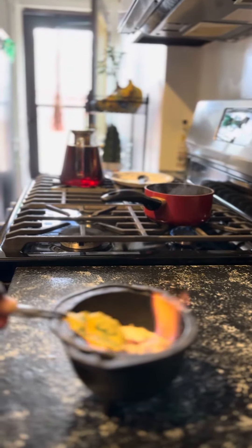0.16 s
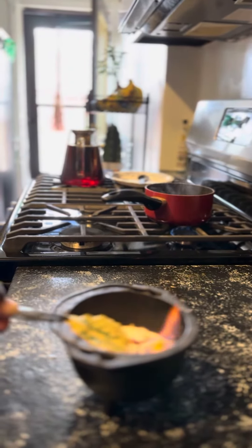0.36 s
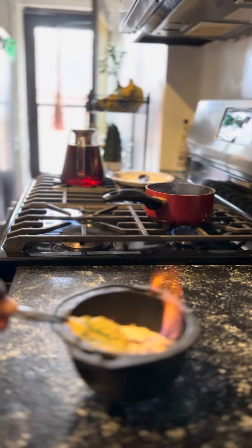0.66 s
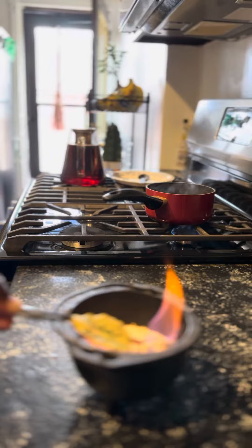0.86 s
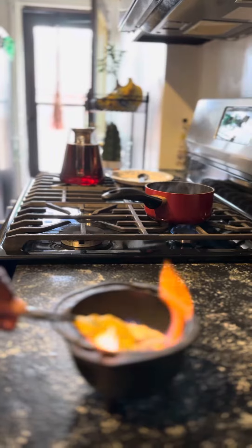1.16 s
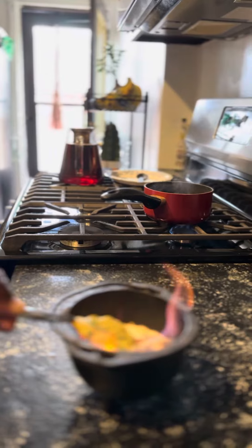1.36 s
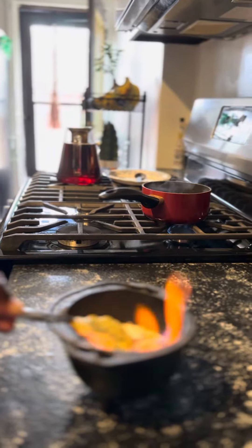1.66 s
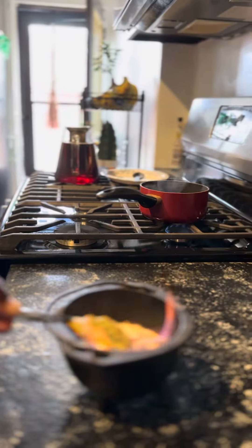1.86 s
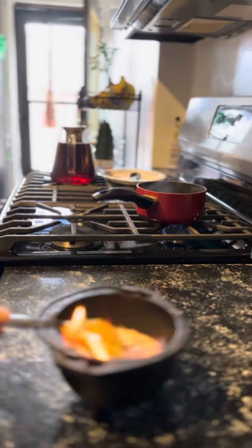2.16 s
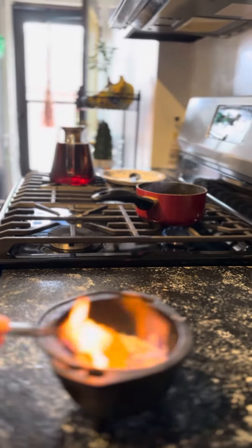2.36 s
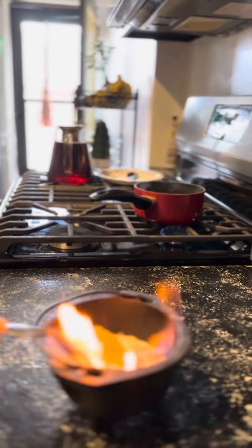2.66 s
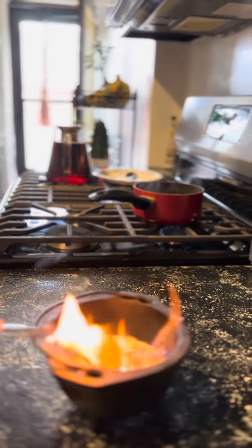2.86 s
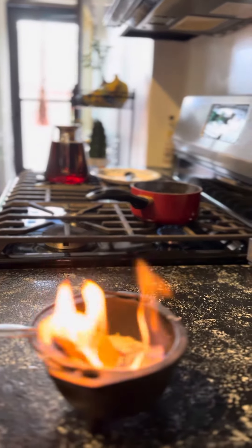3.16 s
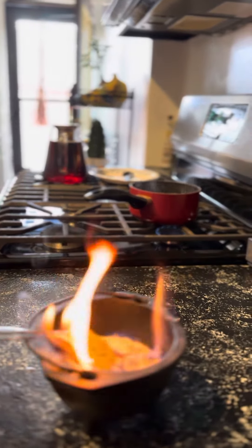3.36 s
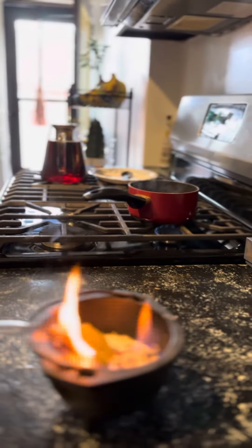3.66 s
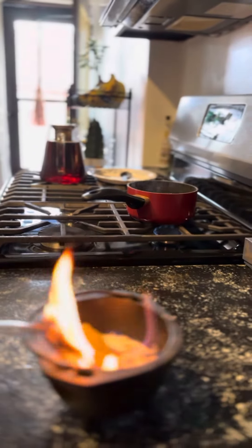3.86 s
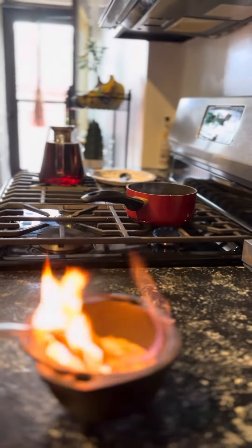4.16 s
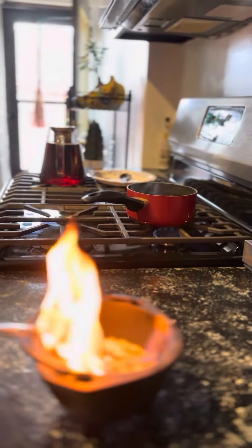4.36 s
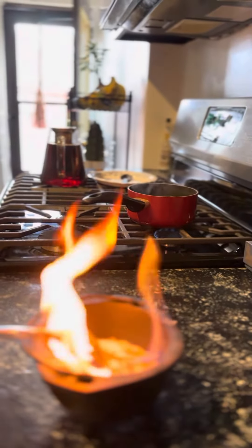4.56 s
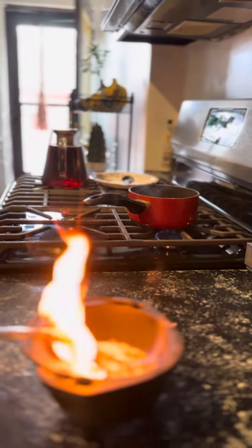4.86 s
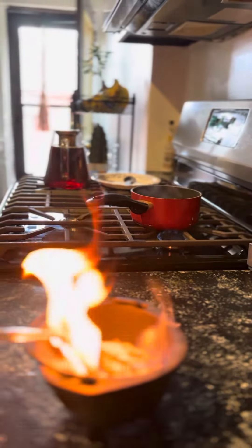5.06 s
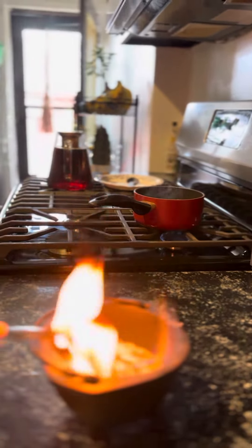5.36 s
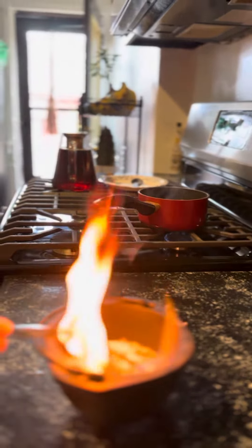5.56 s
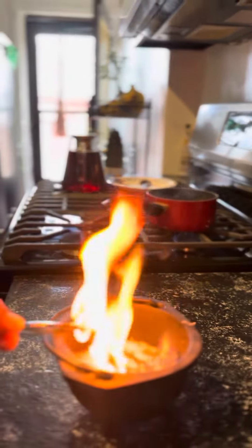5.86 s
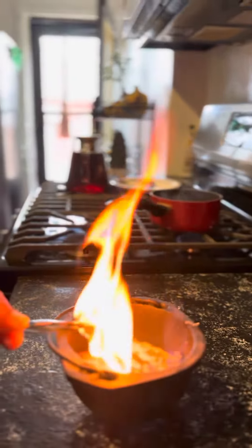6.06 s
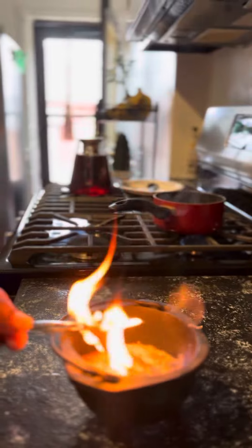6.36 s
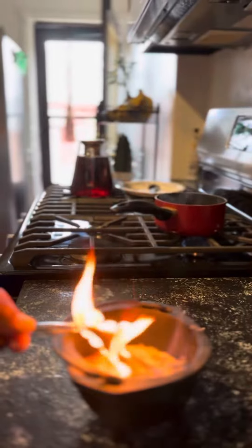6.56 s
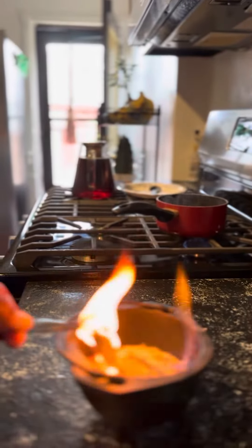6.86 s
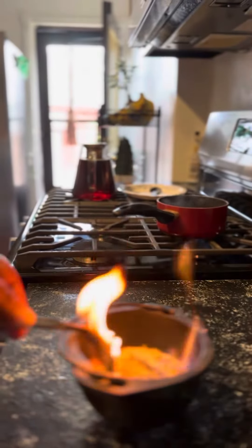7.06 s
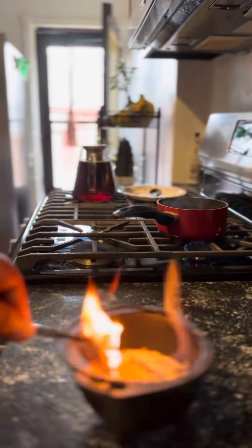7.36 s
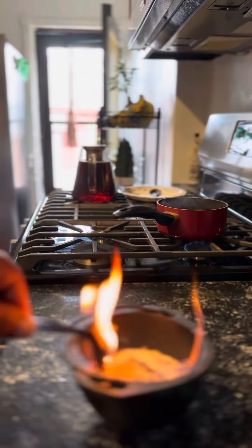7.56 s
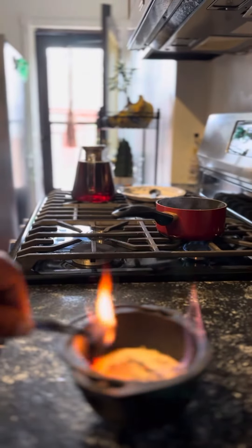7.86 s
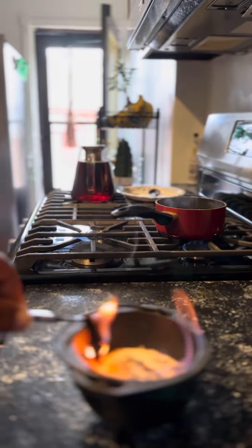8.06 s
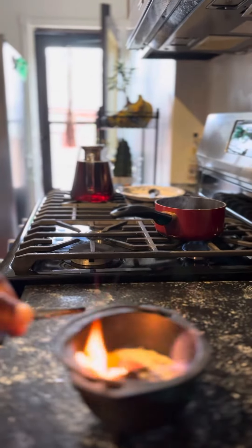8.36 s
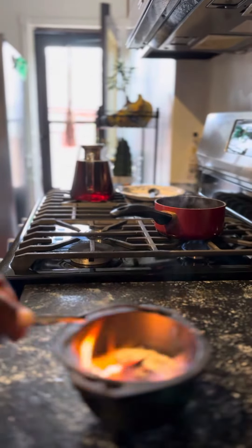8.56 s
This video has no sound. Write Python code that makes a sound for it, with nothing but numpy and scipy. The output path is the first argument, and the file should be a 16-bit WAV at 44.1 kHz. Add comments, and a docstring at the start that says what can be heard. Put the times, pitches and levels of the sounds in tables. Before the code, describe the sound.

A quiet kitchen hum, then paper catches and burns close by, with gusty flame flutter, fizzing crackle and irregular crisp snaps continuing to the end.

```python
"""A low kitchen hum and soft room noise come first, with a faint flame that soon grows.
Paper burns in a small bowl on a counter, close by, flaring up patch by patch.
The flame is made of short puffs with falling pitch, filtered noise and low thuds.
The charring fibres fizz, crackle and snap: tiny bursts of noise and rings, shaped by the paper.
The hum is a set of wavering sine tones; short decaying noise makes the hard room answer."""
import sys
import numpy as np
from scipy import signal
from scipy.fft import rfft, irfft, next_fast_len
from scipy.io import wavfile
from scipy.ndimage import map_coordinates

SR = 44100
rng = np.random.default_rng(int(sys.argv[2]) if len(sys.argv) > 2 else 0)


def materialize(psi):
    """Save the field psi as 16-bit PCM at rate SR to the path in sys.argv[1].

    A 1-D psi becomes a single channel; in a 2-D psi each row is a channel.
    """
    bounded = np.clip(np.atleast_2d(psi).T, -1, 1)
    quanta = np.round(bounded * 32767).astype(np.int16)
    wavfile.write(sys.argv[1], SR, quanta)


N = 384552


def amp(db):
    """Turn decibels into a gain."""
    return 10 ** (np.asarray(db) / 20)


def unit(x):
    """Scale a sound to an rms of 1."""
    return x / np.sqrt(np.mean(x ** 2) + 1e-20)


def along(points, hz):
    """Read a curve of (Hz, value) points, with pitch on a log axis."""
    f, v = np.transpose(points)
    return np.interp(np.log(hz + 1), np.log(f + 1), v)


def curves(rows):
    """Give one value per sample for each column after the time."""
    s, *columns = np.transpose(rows)
    return [np.interp(np.arange(N) / SR, s, column) for column in columns]


def wobble(rate, size=32):
    """A smooth random curve with rate random points a second."""
    coarse = np.arange(0, N + size, size)
    knots = rng.standard_normal(int(N * rate / SR) + 4)
    smooth = map_coordinates(knots, [coarse * rate / SR])
    return np.interp(np.arange(N), coarse, smooth)


def swell(s, length_s):
    """A smooth rise and fall of height 1 around time s; length_s is its width at 1/e of the height."""
    reach = np.minimum(np.abs(np.arange(N) / SR - s) / length_s, 2)
    return np.exp(-(2 * reach) ** 2)


def filtered(x, response):
    """Filter x with a gain (real or complex) given for each frequency."""
    m = next_fast_len(N + SR // 2)
    return irfft(rfft(x, m) * response(np.fft.rfftfreq(m, 1 / SR)), m)[..., :N]


def coloured(x, spectrum, size=4096):
    """Give x a spectrum through a filter of energy 1 that never sounds ahead of its input."""
    cepstrum = irfft(np.log(amp(along(spectrum, np.fft.rfftfreq(size, 1 / SR)))))
    # folding the cepstrum forward gives minimum phase
    cepstrum[1:size // 2] *= 2
    cepstrum[size // 2 + 1:] = 0
    response = irfft(np.exp(rfft(cepstrum)))
    return signal.fftconvolve(x, response / np.linalg.norm(response))[:N]


def add(track, s, sound):
    """Mix a short sound into a track at time s."""
    part = track[max(round(s * SR), 0):][:len(sound)]
    part += sound[:len(part)]


def placed(times, rows):
    """Make a track in which each short row starts at its time."""
    starts = np.round(np.abs(times) * SR).astype(int)[:, None]
    where = starts + np.arange(rows.shape[1])
    return np.bincount(where.ravel(), rows.ravel(), N)[:N]


def sparks(rate, spread_db):
    """Random clicks, about rate a second, with sizes scattered in dB; rms 1."""
    at = np.flatnonzero(rng.random(N) < rate / SR)
    size, sign = rng.standard_normal((len(at), 2)).T
    clicks = np.sign(sign) * amp(spread_db * np.minimum(size, 2))
    return unit(np.bincount(at, clicks, N))


# How alike the room noise is at the two microphone ports: f/Hz, likeness (1 = the same)
PORT_LIKENESS = [(60, .98), (300, .92), (700, .5), (2000, .25), (8000, .15)]
# Colour of the room noise: f/Hz, level/dB (relative, per Hz)
KITCHEN_SPECTRUM = [(20, -34), (45, -5.5), (62, 10), (90, -6.5), (135, -1), (210, -4.5), (340, -3.5),
                    (700, -16), (1100, -33), (1700, -25.5), (2400, -26), (3400, -38.5), (5600, -37.5),
                    (9000, -44), (13000, -81)]
# Tones of the appliance: f/Hz, level/dB (rms, before the wavering)
APPLIANCE_TONES = [(59.5, -64), (120, -71), (147, -67), (339, -68), (589, -77.5), (727, -79.5),
                   (824, -80.5), (904, -94), (1297, -102), (1884, -85)]


def kitchen():
    """Noise arriving from all sides, less alike at the two ports at high pitch, plus an appliance's tones."""
    # a shared and an opposite part, mixed by this angle, set the likeness
    turn = lambda hz: np.arccos(np.clip(along(PORT_LIKENESS, hz), -1, 1)) / 2
    split = lambda hz: amp(along(KITCHEN_SPECTRUM, hz)) * [np.cos(turn(hz)), np.sin(turn(hz))]
    mid, side = filtered(rng.standard_normal((2, N)), split)
    noise = amp(-55.5) * unit(np.array([mid + side, mid - side]))
    t = np.arange(N) / SR
    hum = np.zeros(N)
    for hz, db in APPLIANCE_TONES:
        level = amp(db + 2.9 * wobble(3.7)) * np.sqrt(2)
        hum += level * np.sin(2 * np.pi * hz * t + 0.57 * wobble(6))
    return noise + hum


# How long the room rings, as the time to fall by 60 dB: f/Hz, t/s
ROOM_DECAY = [(200, 0.15), (2500, 0.1), (8000, 0.14), (15000, 0.0066)]


def room(x, count, delay_s=.003):
    """Walls answer with a short tail, different at each port; the sound moves between count spots."""
    hz, t, z = signal.stft(rng.standard_normal((count, 2, SR // 2)), SR, nperseg=256)
    fading = amp(-60 * t / along(ROOM_DECAY, hz)[:, None])
    tails = signal.istft(z * fading, SR, nperseg=256)[1]
    tails /= np.linalg.norm(tails, axis=2, keepdims=True)
    spots = np.exp(2 * np.array([wobble(40) for _ in tails]))
    late = np.pad(x, (int(delay_s * SR), 0))[:N] * spots / np.linalg.norm(spots, axis=0)
    return signal.oaconvolve(late[:, None], tails, axes=2).sum(0)[:, :N]


# Level difference of the two ports, left minus right: f/Hz, level/dB
PORT_BALANCE = [(150, .3), (400, 1.4), (700, 4), (1100, 2.5), (1600, .8), (2900, 3.5), (3900, 0),
                (5200, -3.5), (7000, 0)]
# Phase by which the left port leads: f/Hz, phase/radians
PORT_LEAD = [(100, 0), (700, .6), (1200, -.3), (2700, .1), (3200, -1.1), (4000, 0), (4900, 2.3), (5800, 0),
             (7500, -.5), (11000, -2.6), (15500, -3.8)]


def ports(x):
    """Direct sound reaches the two microphone ports with a different phase and level."""
    half = np.array([[1], [-1]]) / 2
    gain = lambda hz: amp(half * along(PORT_BALANCE, hz))
    return filtered(x, lambda hz: gain(hz) * np.exp(1j * half * along(PORT_LEAD, hz)))


RIM_S, RIM_DB = 0.0028, -9  # decay time (s) and level (dB) of the early reflections


def rim(x, size=512, count=5):
    """Early reflections off bowl and counter, different at each port, change with the spot that burns."""
    t = np.arange(size) / SR
    clusters = rng.standard_normal((count, 2, size)) * np.sqrt(t) * np.exp(-t / RIM_S)
    clusters /= np.linalg.norm(clusters, axis=2, keepdims=True)
    spots = np.array([wobble(90) for _ in clusters])
    spots /= np.linalg.norm(spots, axis=0)
    return amp(RIM_DB) * signal.oaconvolve((spots * x)[:, None], clusters, axes=2).sum(0)[:, :N]


# Slow course of the fire: t/s, flame level/dB, charring level/dB
SLOW_BURN = [(0, -70.5, -85.5), (.42, -69.5, -88), (.49, -63, -76), (1.9, -62.5, -70), (3.2, -61.5, -64.5),
             (4.2, -56.5, -59.5), (5.1, -60.5, -64.5), (5.75, -62, -71.5), (7.2, -63.5, -68.5),
             (7.8, -59.5, -64.5), (8.72, -61.5, -72.5)]
# Flares, each a fresh patch that catches, swells and dies down:
# t/s (at the height), length/s, flame gain level/dB, charring gain level/dB
PATCH_FLARES = [(0.602, 0.1405, 3.5, 12.5), (0.744, 0.137, 3, 11), (0.877, 0.094, 6.5, 3.5),
                (1.054, 0.19, 1.5, 8.5), (1.293, 0.24, 3, 9), (1.633, 0.37, -0.5, 11.5),
                (1.98, 0.22, 1.5, 10), (2.152, 0.033, 6, -1), (2.259, 0.39, 8.5, 14), (2.566, 0.18, 2.5, 7),
                (2.772, 0.097, 8.5, 9.5), (3.157, 0.11, 4.5, 2.5), (3.324, 0.048, -2, 3.5),
                (3.615, 0.24, 5, 13), (3.975, 0.089, 2.5, 2.5), (4.139, 0.049, 4, 0.5),
                (4.246, 0.26, 5.5, 4), (4.405, 0.051, 5, 6.5), (4.54, 0.098, 2, -0.5),
                (4.862, 0.14, 4.5, 8), (5.015, 0.076, 7, 0.5), (5.189, 0.155, 7, 4), (5.527, 0.18, 4.5, 9),
                (5.972, 0.48, 6, 8), (6.377, 0.3, 6, 9), (6.842, 0.32, 6, 8), (7.318, 0.09, 5, 7),
                (7.657, 0.068, 3.5, -0.5), (7.95, 0.17, 5.5, 6.5), (8.136, 0.25, 5.5, 13),
                (8.454, 0.11, 1.5, -8)]
# Lulls, where the fire falters between two patches: t/s (at the lowest), length/s, gain level/dB
FIRE_LULLS = [(0.816, 0.035, -9), (1.909, 0.046, -2), (2.386, 0.03, -5), (2.85, 0.041, -3.5),
              (3.491, 0.05, -4), (4.061, 0.028, -1), (7.221, 0.033, -2.5)]


def fire():
    """Flame and charring levels in dB: flares push them about the slow burn, and both sink in a lull."""
    flame_db, char_db = curves(SLOW_BURN)
    for s, length_s, flame_gain_db, char_gain_db in PATCH_FLARES:
        shape = swell(s, length_s)
        flame_db = flame_db + flame_gain_db * shape
        char_db = char_db + char_gain_db * shape
    lull_db = sum(db * swell(s, length_s) for s, length_s, db in FIRE_LULLS)
    return flame_db + lull_db, char_db + lull_db


# Resonances of the bowl and the things around it: f/Hz, width f/Hz, level/dB against the direct sound
BOWL_RESONANCES = [(355.3, 80, 4.5), (477, 12, -6.5), (587, 8.2, -1), (715, 23, -5), (910, 15, -19),
                   (1035, 72, -9.5), (1288, 58, 1.5)]


def bowl(x):
    """The bowl and the things around it ring at their own low pitches when the flame drives them."""
    ring = lambda f: sum(amp(db) * 1j * f * w / (c * c - f * f + 1j * f * w)
                         for c, w, db in BOWL_RESONANCES)
    return filtered(x, lambda f: amp(-2.5) * (1 + ring(f)))


RUMBLE_DB, RUMBLE_FOLLOWS = -54, 0.62  # middle level (dB, before the bowl); dB per dB of flame
# Colour of the flame's rumble: f/Hz, level/dB (relative, per Hz)
RUMBLE_SPECTRUM = [(20, -12), (45, -5.5), (75, 0.5), (100, -2), (155, 3), (200, -7.5), (270, -18),
                   (450, -24.5), (1500, -58)]


def rumble(flame_db, flicker_db):
    """A lumpy rumble: random clicks given a deep colour, following the flame and its flicker."""
    follow_db = RUMBLE_FOLLOWS * (flame_db - flame_db.mean())
    level_db = RUMBLE_DB + follow_db + flicker_db + 2.0 * wobble(16)
    return amp(level_db) * unit(coloured(sparks(rate=300, spread_db=3), RUMBLE_SPECTRUM))


def puff(hz, glide_s=0.000873, life_s=0.0011):
    """A few pressure cycles slow from 3 * hz as the gas pocket swells, passing hz at 2 * glide_s; peak 1."""
    t = np.arange(SR // 40) / SR
    phase = 2 * np.pi * 3 * hz * glide_s * np.log1p(t / glide_s)
    return -np.sin(phase) * np.sqrt(t / life_s * np.exp(1 - t / life_s))


FLUTTER_DB = 2.5  # lift of the flutter over the flame level (dB)
# Colour of the flame's roar: f/Hz, level/dB (relative, per Hz)
ROAR_SPECTRUM = [(60, -41.5), (190, -6), (275, -20.5), (350, 2), (500, -3), (720, -2.5), (1100, -9.5),
                 (1300, -13), (1550, -19), (2600, -17), (5000, -17.5), (12000, -38)]


def flutter(flame_db, flicker_db, soft_hz=1500):
    """Gas pockets catch in a stream of small soft puffs, over a roar of unsteady noise."""
    stream = sum(unit(signal.fftconvolve(sparks(rate=100, spread_db=5.5), puff(hz))[:N])
                 for hz in (400, 580, 880))
    stream = filtered(stream, lambda hz: 1 / np.hypot(1, (hz / soft_hz) ** 2))
    gusts = amp(6.2 * np.minimum(wobble(110), 1.5))
    roar = unit(coloured(rng.standard_normal(N) * gusts, ROAR_SPECTRUM))
    return amp(flame_db + FLUTTER_DB + flicker_db) * (amp(-7.5) * stream + amp(-6.0) * roar)


PUFF_DB = 3.5  # peak of a big puff over its listed level (dB)
# Biggest gas pockets that catch at once: t/s, level/dB (before the bowl), f/Hz (a third of the start pitch)
BIG_PUFFS = [(0.182, -53, 585), (0.704, -51, 436), (0.885, -50.5, 644), (1.042, -45, 687),
             (1.101, -42, 464), (1.168, -45.5, 395), (1.421, -46.5, 401), (1.979, -51, 422),
             (2.134, -44.5, 651), (2.15, -42, 640), (2.162, -46, 380), (2.225, -44, 320), (2.283, -40, 457),
             (2.311, -40.5, 430), (2.335, -43, 495), (2.713, -44.5, 482), (3.325, -44.5, 400),
             (3.949, -42.5, 482), (3.986, -44.5, 518), (4.11, -43.5, 642), (4.129, -41, 594),
             (4.193, -43, 416), (4.209, -42, 450), (4.262, -43, 587), (4.404, -41, 564),
             (4.449, -43.5, 461), (4.502, -50, 404), (5.203, -45, 420), (5.63, -41.5, 451),
             (5.753, -43.5, 470), (5.81, -48, 382), (6.005, -44, 490), (6.08, -45, 489.6),
             (6.397, -44, 745), (6.422, -38.5, 437), (6.478, -46, 856), (6.644, -43.5, 665),
             (6.758, -42.5, 602), (6.793, -43, 347.7), (7.818, -49, 419), (7.904, -44.5, 400),
             (7.994, -47.5, 810), (8.003, -42, 418), (8.057, -38.5, 613), (8.076, -47, 379),
             (8.103, -38, 562), (8.121, -44, 605), (8.129, -43.5, 634), (8.347, -43.5, 589)]


def big_puffs():
    """Large gas pockets catch at once, each one a single louder puff."""
    track = np.zeros(N)
    for s, db, hz in BIG_PUFFS:
        add(track, s, amp(db + PUFF_DB) * puff(hz))
    return track


THUD_S, THUD_DB = 0.026, 0.2  # length (s, at 1/e of the height); peak over the listed level (dB)


def thud(hz, sag_octaves=0.35):
    """A soft low push, centred in its window, whose pitch sags as the flame lifts off; peak envelope 1."""
    u = np.linspace(-1.5, 1.5, int(3 * THUD_S * SR))  # time in thud lengths
    phase = 2 * np.pi * (np.cumsum(hz * 2 ** (-sag_octaves * u)) / SR + rng.random())
    return np.sin(phase) * np.exp(-(2 * u) ** 2)


# Low thuds of the flame: t/s (at the height), level/dB (before the bowl), f/Hz (at the height)
FLAME_THUDS = [(0.719, -41, 81), (1.514, -41, 116.5), (2.075, -40.5, 95), (2.231, -42, 130),
               (2.339, -36, 120), (2.459, -43, 139), (2.723, -45, 125), (2.862, -42, 130),
               (3.338, -38.5, 89.9), (3.602, -46.5, 98.4), (3.931, -39.5, 116), (4.144, -42, 130),
               (4.246, -42.5, 115), (4.315, -41, 111), (4.375, -43, 138.4), (4.446, -45.5, 105),
               (4.567, -43, 118.9), (4.873, -43, 125.7), (5.178, -42, 129.2), (5.271, -39, 105.4),
               (5.48, -45, 105), (5.558, -46.0, 145.4), (5.766, -41, 146.5), (6.006, -45.0, 119.9),
               (6.06, -40, 135), (6.206, -45.5, 110.6), (6.377, -45, 124.2), (6.429, -43, 161),
               (6.799, -41.5, 139.9), (7.519, -41.5, 89.8), (7.939, -44, 101), (8.079, -44, 110.7),
               (8.601, -44, 109.8)]


def thuds():
    """Tongues of flame break away, each with one low thud."""
    track = np.zeros(N)
    for s, db, hz in FLAME_THUDS:
        push = thud(hz)
        add(track, s - len(push) / SR / 2, amp(db + THUD_DB) * push)
    return track


def flame(flame_db):
    """Flutter and rumble share one flicker; big puffs and thuds stand out, and all of it drives the bowl."""
    flicker_db = 1.13 * wobble(24)
    steady = flutter(flame_db, flicker_db) + rumble(flame_db, flicker_db)
    return bowl(steady + big_puffs() + thuds())


def sheet(x):
    """Bending waves cross paper faster at high pitch, so the low part of each crack arrives later."""
    delay_s, at_hz = .0009, 3000  # the delay at this pitch
    return filtered(x, lambda hz: np.exp(-4j * np.pi * delay_s * np.sqrt(at_hz * hz)))


# Colour of cracking paper: f/Hz, level/dB (relative, per Hz)
PAPER_SPECTRUM = [(250, -46), (750, -23), (1200, -11), (1900, -10), (2300, -5.5), (2650, 4), (3000, -1.5),
                  (3400, -4), (4100, -6), (5100, -2.5), (6100, 0.5), (7100, -0.5), (8100, -1), (9400, 7.5),
                  (11700, -2.5), (15000, -0.4)]


def paper_colour(x):
    """The paper's own resonances colour every bright break."""
    return coloured(x, PAPER_SPECTRUM)


def ringlets(count, hz, spread, cycles=1.9, size=256):
    """Flakes ring briefly, one per row, with pitches scattered by spread octaves around hz; energy 1."""
    pitch = np.minimum(hz * 2 ** (spread * rng.standard_normal((count, 1))), SR / 3)
    turns = pitch * np.arange(size) / SR
    rings = np.sin(2 * np.pi * turns) * np.exp(-turns / cycles)
    return rings / np.linalg.norm(rings, axis=1, keepdims=True)


def breaks(times, gains, split_db, ring_db, size=256):
    """A break is a clean crack, quick splitting, faint tearing and a flake's ring: energy 1, then its gain."""
    split_s, tear_s, tear_db = .00028, .0016, -6
    flake_hz, flake_octaves = 6500, .65
    t = np.arange(size) / SR
    shape = lambda life_s: np.exp(-t / life_s) / np.linalg.norm(np.exp(-t / life_s))
    envelope = np.hypot(amp(split_db) * shape(split_s), amp(tear_db) * shape(tear_s))
    bursts = rng.standard_normal((len(times), size)) * envelope
    bursts[:, 0] = 1  # the clean crack
    bursts += amp(ring_db) * ringlets(len(times), flake_hz, flake_octaves, size=size)
    return placed(times, bursts * (gains / np.linalg.norm(bursts, axis=1))[:, None])


# Runs of breaking fibres: starts a second, decay time (s), size scatter (dB), level between runs
RUN_PER_S, RUN_S, RUN_SPREAD_DB, SIMMER = 130, 0.0038, 3, 0.55


def runs():
    """One break sets off its neighbours: an envelope, rms 1, that jumps at random and dies in milliseconds."""
    decay = np.exp(-np.arange(SR // 20) / SR / RUN_S)
    starts = np.abs(sparks(rate=RUN_PER_S, spread_db=RUN_SPREAD_DB))
    jumps = signal.fftconvolve(starts, decay)[:N]
    return unit(np.hypot(SIMMER, unit(jumps)) * amp(0.86 * wobble(30)))


def curling(x, spectrum, octaves, moves_per_s=150):
    """The sheet's resonances lie lower or higher with the spot that breaks: three shifted spectra."""
    spot = np.argmax([wobble(moves_per_s) for _ in range(3)], axis=0) - 1
    shifted = lambda k: [(hz * 2 ** (k * octaves), db) for hz, db in spectrum]
    return sum(coloured(x * (spot == k), shifted(k)) for k in (-1, 0, 1))


BUCKLE_PER_S, BUCKLE_SPREAD_DB = 380, 6.5  # pops a second and their size scatter (dB)
BUCKLE_HZ, BUCKLE_OCTAVES = 1830, 0.41  # middle pitch (Hz) and its scatter (octaves)


def buckles():
    """Larger flakes buckle with small dull pops, each at its own pitch; rms 1."""
    sizes = sparks(rate=BUCKLE_PER_S, spread_db=BUCKLE_SPREAD_DB)
    at = np.flatnonzero(sizes)
    return unit(placed(at / SR, sizes[at, None] * ringlets(len(at), BUCKLE_HZ, BUCKLE_OCTAVES)))


CRACKLE_DB, CRINKLE_DB, BUCKLE_DB = 2.5, -1.5, -9  # bright fibres, dull sheet, pops: dB over the charring
CRINKLE_FOLLOWS_FLAME = 0.018  # the sheet curls more under a big flame (dB per dB)
CRINKLE_FADE_DB_PER_S = 0.5  # the sheet crinkles less as it turns to ash
CRINKLE_RUNS = 0.86  # how closely the crinkle follows the runs, 0-1
CROWDED_DB = -57  # charring level around which the breaks crowd together (dB)
# Colour of the curling sheet: f/Hz, level/dB (relative, per Hz)
CRINKLE_SPECTRUM = [(300, -38), (1300, -10.5), (2200, -16.5), (2450, -5.5), (2630, 3), (2900, -3),
                    (3200, -6), (4000, -18.5), (5800, -13.5), (9000, -19), (15000, -49)]


def crackle(flame_db, char_db):
    """Fibres break in runs of fizz, ticks, crinkle and pops; strong charring merges runs into a sizzle."""
    t = np.arange(N) / SR
    crinkle_db = char_db + CRINKLE_DB
    crinkle_db = crinkle_db + CRINKLE_FOLLOWS_FLAME * (flame_db - flame_db.mean())
    crinkle_db = crinkle_db - CRINKLE_FADE_DB_PER_S * (t - t.mean())
    crowding = 1 + amp(char_db - CROWDED_DB) ** 2
    clumps = np.sqrt((runs() ** 2 + crowding - 1) / crowding)
    # more breaks a second, each one smaller, so that crowding alone adds no loudness
    crowded_sparks = lambda rate, spread_db: unit(sparks(rate * crowding, spread_db) / np.sqrt(crowding))
    fizz = amp(-8.0) * sparks(rate=2600, spread_db=1.0)
    sizes = crowded_sparks(rate=170, spread_db=4.5)
    at = np.flatnonzero(sizes)
    ticks = amp(-4.0) * breaks(at / SR, sizes[at], split_db=-7, ring_db=-1)
    bright = paper_colour(amp(char_db + CRACKLE_DB) * clumps * (fizz + ticks))
    creases = amp(crinkle_db) * unit(clumps ** CRINKLE_RUNS) * crowded_sparks(rate=400, spread_db=7.5)
    dull = curling(creases, CRINKLE_SPECTRUM, octaves=0.06)
    return bright + dull + amp(char_db + BUCKLE_DB) * buckles()


# Small snaps: number a second, middle level (dB), scatter (dB), dB per dB of charring
STRAY_PER_S, STRAY_DB, STRAY_SPREAD_DB, STRAY_FOLLOWS = 45, -57.5, 2, 0.67


def stray_snaps(char_db, body_db=-6, body_spread_db=3):
    """Rows of small snaps at random moments once paper has caught; stronger charring makes them louder."""
    caught_db = -80
    at = np.flatnonzero((rng.random(N) < STRAY_PER_S / SR) & (char_db > caught_db))
    size, body = rng.standard_normal((len(at), 2)).T
    db = STRAY_DB + STRAY_FOLLOWS * (char_db[at] - char_db.mean()) + STRAY_SPREAD_DB * size
    return np.column_stack([at / SR, db, body_db + body_spread_db * body])


# Loudest snaps of the paper: t/s, level/dB (before the lifts below), level/dB of the low body against it
LOUD_SNAPS = [(0.473, -55, 2), (0.512, -57, 3), (0.520, -51, -1), (0.581, -49.5, 8), (0.609, -51, 5),
              (0.705, -56, 8), (0.74, -52, -2), (0.938, -50, 1), (1.034, -57.5, 6), (1.042, -57, 4),
              (1.05, -59, 5), (1.101, -54, 0), (1.111, -56, 0), (1.189, -48.5, -1), (1.21, -50.5, -1),
              (1.226, -46.5, 3), (1.243, -48, -6), (1.253, -47.5, -1.5), (1.27, -51, 2), (1.284, -56, -4),
              (1.302, -50, 1), (1.313, -46, -2), (1.324, -44.5, -6), (1.363, -50, 5), (1.458, -38.5, 3),
              (1.532, -44, -5), (1.535, -39, -11), (1.539, -45, -6), (1.559, -48, 8.5), (1.584, -46.5, 5),
              (1.604, -42, 1), (1.616, -34, -7.5), (1.683, -20.5, -5), (1.782, -56, 4), (1.872, -53, 4),
              (1.942, -40.5, -5), (1.973, -46, 3.5), (2.021, -43, -2.5), (2.04, -39.5, -17),
              (2.125, -46, 8.5), (2.181, -37, 3.5), (2.197, -38, -6), (2.225, -37.5, -1), (2.27, -31.5, -5),
              (2.353, -27, -0.5), (2.431, -37, -5), (2.443, -44, 0), (2.489, -50, -17), (2.597, -40.5, -6),
              (2.623, -44.5, -12), (2.649, -48, -2), (2.714, -46, 3), (2.802, -45.5, -13), (2.912, -44, -1),
              (2.99, -50, -2), (3.087, -46, -8), (3.118, -40.5, 3.5), (3.285, -43, -7), (3.368, -42, -7),
              (3.525, -58, 1), (3.579, -41, 3), (3.591, -36, -5), (3.593, -35, -4), (3.604, -39, 0),
              (3.607, -37, -5), (3.629, -53, 2), (3.651, -42, -6), (3.666, -43, -1), (3.687, -37, -19),
              (3.718, -63, 0), (3.737, -56.5, 1), (3.781, -41.5, -4), (3.896, -51.5, 3), (3.969, -39.5, -9),
              (3.99, -36.5, -3), (4.034, -38.5, -7), (4.042, -45, -13), (4.173, -40.5, -17),
              (4.192, -55, -5), (4.218, -55, -5.5), (4.238, -36, -8), (4.287, -39, -7), (4.369, -35.5, -10),
              (4.407, -45.5, 3), (4.443, -40.5, -4), (4.511, -42, -6), (4.663, -42, -2), (4.787, -41, -11),
              (4.798, -47, -5), (4.829, -41, -12), (4.843, -40.5, 2), (4.955, -38.5, -0.5), (5.204, -51, 7),
              (5.353, -50, 6.5), (5.534, -37.5, -3.5), (5.653, -61, 1), (5.692, -61, -6),
              (5.755, -51.5, -8), (5.816, -51, 0), (5.844, -54, 7), (5.92, -47, -6), (5.926, -50.5, -1),
              (5.976, -42, -23), (5.984, -39.5, -22), (6.08, -43, -3), (6.326, -52, -6),
              (6.341, -47.5, -11), (6.364, -36, -8.5), (6.481, -45, -8), (6.757, -44.5, -0.5),
              (6.802, -46, -17), (6.916, -43.5, -9), (6.996, -41, -5.5), (7.271, -43, -7), (7.339, -45, -9),
              (7.457, -42.5, -8), (7.588, -45, 1), (7.661, -45, 5), (7.692, -40, 2), (7.797, -50.5, 2),
              (7.876, -44, -16), (7.905, -37.5, -6), (7.935, -41, -11), (7.95, -39.5, -6), (7.994, -46, 1),
              (8.019, -30.5, -7.5), (8.061, -32.5, -21), (8.081, -40, -7), (8.084, -43, -6),
              (8.12, -38, -3), (8.128, -34.5, -1), (8.138, -41, -1), (8.147, -45, -5), (8.163, -44, -2),
              (8.188, -38, 0), (8.253, -39.5, -3.5), (8.271, -44, 1), (8.347, -63.5, 20), (8.421, -59, 9.5),
              (8.451, -58.5, 7), (8.512, -56, 10), (8.535, -59, 11)]


def snaps(char_db, split_hz=4200):
    """Whole flakes snap sharply: a bright break above split_hz, a fuller one below for larger flakes."""
    s, db, body_db = np.vstack([LOUD_SNAPS, stray_snaps(char_db)]).T
    # the lifts of 20.7 and 26 dB set the energy of each break
    top = breaks(s, amp(db + 20.7), split_db=-7, ring_db=-11)
    body = breaks(s, amp(db + body_db + 26), split_db=-11, ring_db=-21)
    low_share = lambda hz: 1 / (1 + (hz / split_hz) ** 6)
    return paper_colour(top + filtered(body - top, low_share))


def scene():
    """The fire close by, its reflections and the kitchen's background sound."""
    flame_db, char_db = fire()
    gas = flame(flame_db)
    fibres = sheet(crackle(flame_db, char_db))
    paper = fibres + sheet(snaps(char_db))
    # the deepest rumble stays close to the bowl
    spread = filtered(gas, lambda hz: hz ** 2 / np.hypot(hz ** 2, 540 ** 2))
    tail = room(amp(-4.5) * spread, count=2) + room(amp(-13.0) * paper, count=4)
    return ports(gas + paper) + rim(fibres) + tail + kitchen()


def record(dry, low_hz=30, top_hz=16500):
    """The recorder drops the deepest bass and fades out the treble around its band limit."""
    band_limit = lambda hz: np.clip((top_hz - hz) / 1000 + .5, 0, 1)
    return filtered(dry, lambda hz: band_limit(hz) * hz ** 2 / np.hypot(hz ** 2, low_hz ** 2))


dry = scene()
out = record(dry)
materialize(out)
```